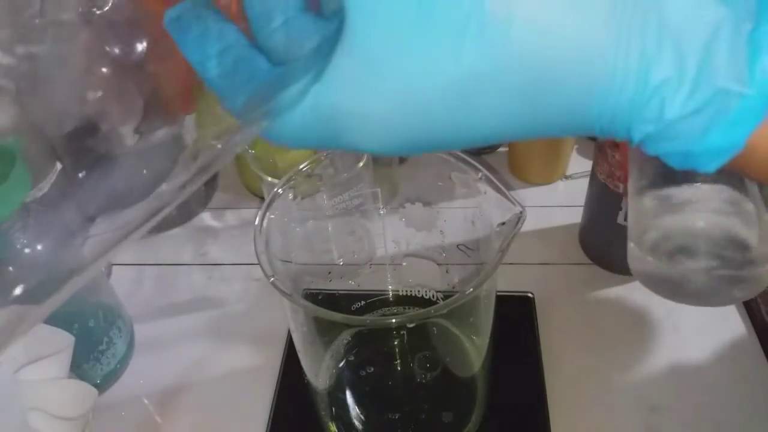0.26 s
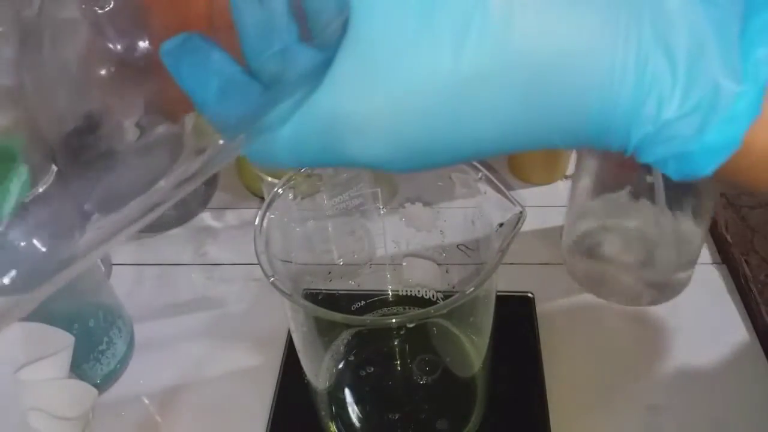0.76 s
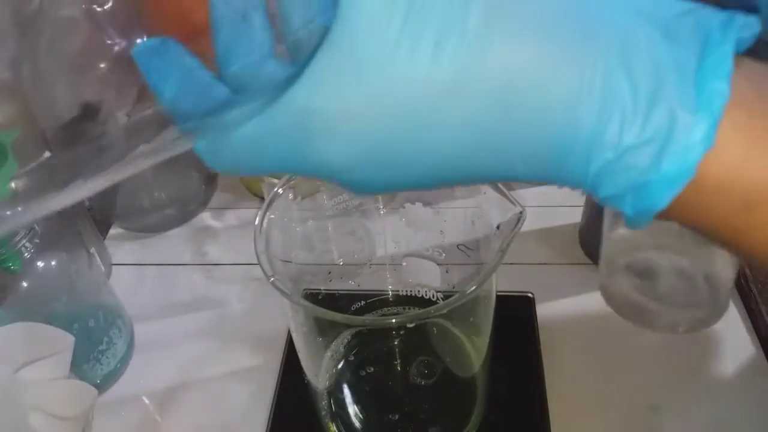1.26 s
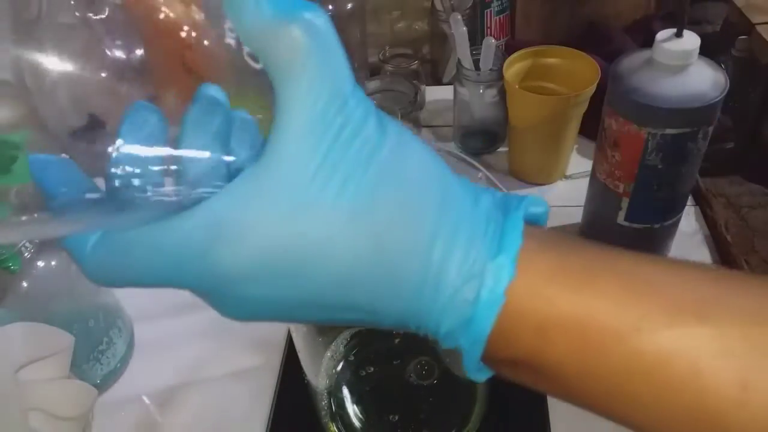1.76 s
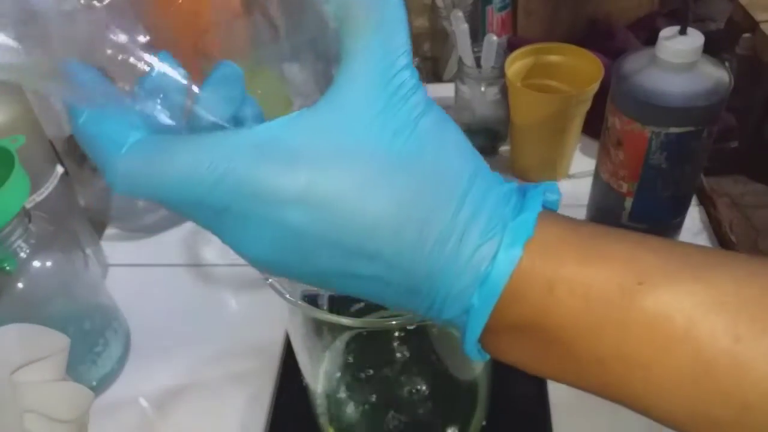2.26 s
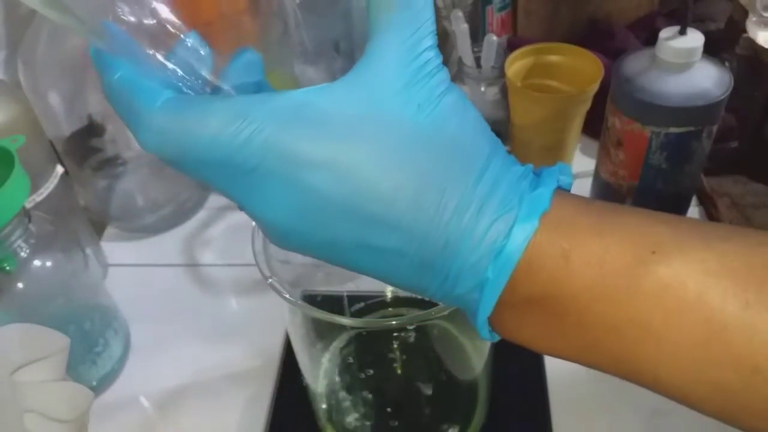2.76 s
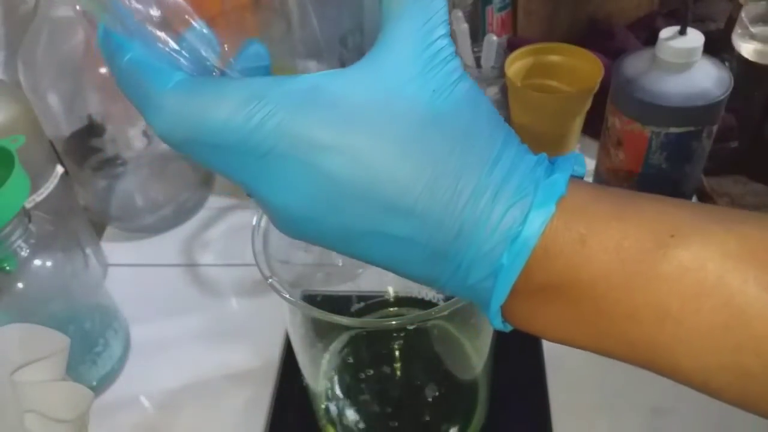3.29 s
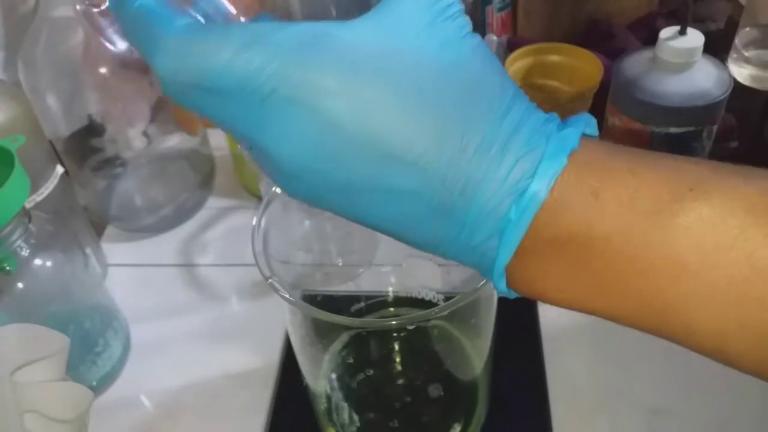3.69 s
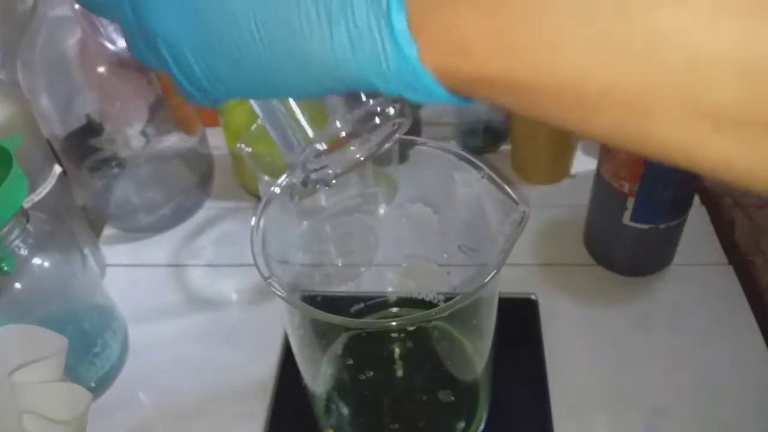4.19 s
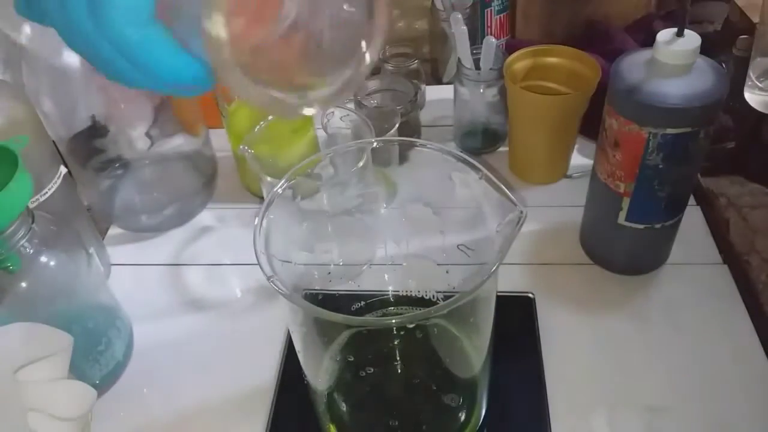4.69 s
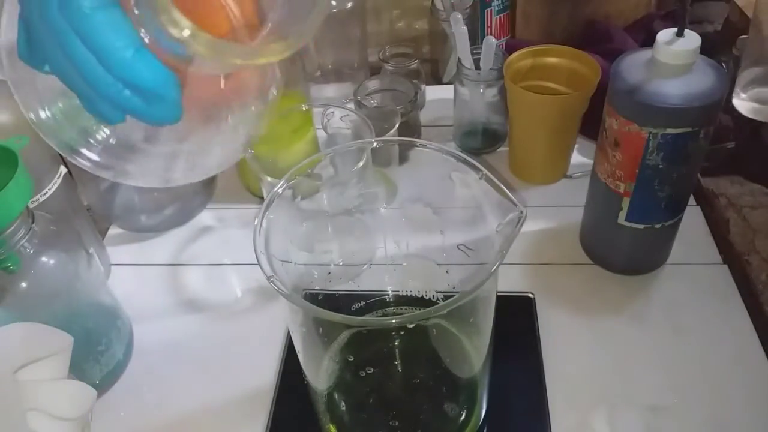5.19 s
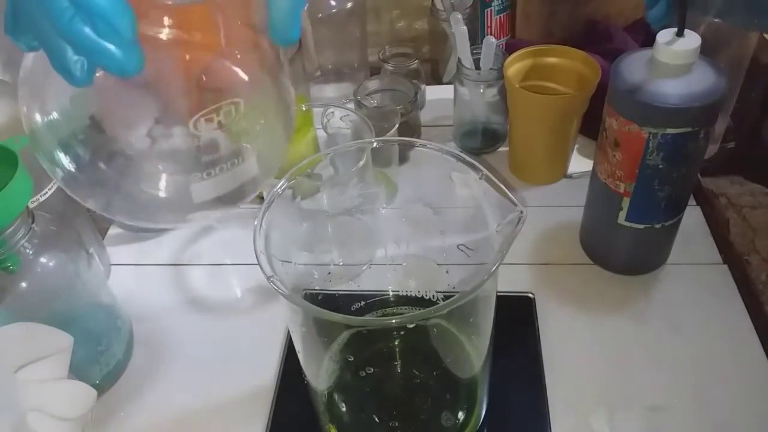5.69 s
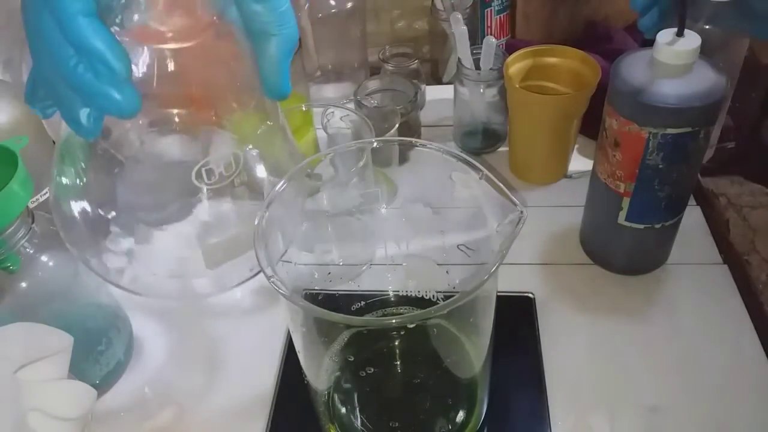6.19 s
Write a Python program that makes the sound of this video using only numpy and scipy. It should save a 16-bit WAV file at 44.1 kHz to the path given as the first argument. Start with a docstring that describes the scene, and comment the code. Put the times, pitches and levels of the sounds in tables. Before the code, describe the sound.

In a small, fairly dry room, heard close, a trigger sprayer works in quick strokes from the very start until about 1.2 seconds, roughly one every quarter second. Each full stroke is a very short, rough valve buzz with a hissing jet; most make the glass flask ring brightly. Sharp plastic clicks, rasps and tiny gulps come between, with one high bubble blip near 0.95. After a pause, the rinse is poured at about 2.0: a tight cluster of loud, bright and hollow plops, smaller splashes to 2.3, then faint drips and trickling until 3.3. Quiet follows, with barely audible drops at 4.1 and 4.55. At 5.93 the flask clacks on tile, bounces and rings briefly, with softer rocking knocks at 6.2 and 6.27. Underneath are low hum, faint hiss and a distant engine rising until 4.9, then sinking to idle.

```python
"""A trigger sprayer rinses a glass flask in quick strokes: valve buzz, hissing jet and ringing glass from pulses,
coloured noise and wavering modes, then the plastic clicks and rasps of the trigger springing back.
The rinse is tipped into a beaker as decaying bubble tones and slaps of noise.
The flask is set down on a tiled bench as struck modes and noise knocks, and rocks once.
A small room lies around it with air noise, mains hum, thin high hiss, faint tones and a distant engine."""
import sys
import numpy as np
from scipy import signal
from scipy.fft import rfft, irfft, next_fast_len
from scipy.io import wavfile
from scipy.ndimage import map_coordinates

SR = 44100
rng = np.random.default_rng(int(sys.argv[2]) if len(sys.argv) > 2 else 0)


def unload_audio(sound):
    """Save the sound as a 16-bit wav file, at the path given as the first command line argument."""
    columns = np.transpose(np.atleast_2d(sound))
    # keep every value between -1 and 1, then stretch to whole-number steps
    steps = np.round(np.clip(columns, -1, 1) * 32767)
    wavfile.write(sys.argv[1], SR, steps.astype(np.int16))


N = 284445
TOP_HZ = 15550  # upper band limit


def amp(db):
    """Decibels to gain."""
    return 10 ** (np.asarray(db) / 20)


def unit(x):
    """Scale to rms 1."""
    return x / np.sqrt(np.mean(x ** 2) + 1e-20)


def along(points, hz):
    """Read (Hz, value) points on a log frequency axis."""
    point_hz, values = np.transpose(points)
    return np.interp(np.log(hz + 1), np.log(point_hz + 1), values)


def clock(seconds):
    """Sample times of a stretch."""
    return np.arange(int(seconds * SR)) / SR


def add(track, s, sound):
    """Mix a sound into the track at s seconds, cut at the track's ends."""
    at = round(s * SR)
    part = sound[max(-at, 0):max(N - at, 0)]
    track[max(at, 0):][:len(part)] += part


def wobble(rate, size):
    """A smooth random curve, rate knots a second."""
    knots = rng.standard_normal(int(size * rate / SR) + 4)
    return map_coordinates(knots, [np.arange(size) * rate / SR])


def filtered(x, response):
    """Shape the spectrum of x by a response of frequency."""
    padded = next_fast_len(len(x) + 8192)
    spectrum = rfft(x, padded) * response(np.fft.rfftfreq(padded, 1 / SR))
    return irfft(spectrum, padded)[:len(x)]


def noise(colour, size):
    """Noise of rms 1 with the given colour."""
    return unit(filtered(rng.standard_normal(size), lambda hz: amp(along(colour, hz))))


def band(hz, width, size):
    """Narrow noise of rms 1 around one pitch."""
    return unit(filtered(rng.standard_normal(size), lambda f: np.exp(-2 * ((f - hz) / width) ** 2)))


def burst(colour, t, t60, attack):
    """A knock of coloured noise that dies away."""
    return noise(colour, len(t)) * amp(-60 * t / t60) * (1 - np.exp(-t / attack))


def swell(t, length, rise, t60):
    """An envelope that climbs for the rise time and starts to die after the length."""
    return np.minimum(t / rise, 1) * amp(-60 * np.maximum(t - length, 0) / t60)


def causal(colour):
    """The short impulse response of the colour, its energy packed at the front (minimum phase)."""
    log_gain = np.log(amp(along(colour, np.fft.rfftfreq(1024, 1 / SR))))
    cepstrum = irfft(log_gain)
    fold = 1 + np.sign(len(cepstrum) / 2 - np.arange(len(cepstrum)))
    fold[0] = 1
    return irfft(np.exp(rfft(cepstrum * fold)))


# Colour of the valve's spits. Each row: frequency in Hz, level in dB per Hz.
BUZZ_COLOUR = [(180, -71.5), (300, -45), (877, -26), (1160, -32.5), (1750, -13.5), (2040, -17), (2610, -3),
               (3280, -14), (4720, -0.5), (7750, -0.5), (9760, -24), (11700, -2), (15500, -29)]
# Colour of the jet's hiss, also of the trigger's tick. Each row: frequency in Hz, level in dB per Hz.
JET_COLOUR = [(180, -49), (300, -25.5), (1180, -25.5), (1300, -2), (1750, -27.5), (1910, -11.5),
              (3870, -13), (7140, -5), (8560, -17.5), (15500, -6.5)]


def valve_buzz(t, length, rate_hz, hiss_db=-6):
    """The valve chatters open and shut: each opening is a sharp spit that echoes in the flask's neck."""
    cycles = np.cumsum(rate_hz * (1 + .015 * wobble(90, len(t)))) / SR
    spits = np.diff(np.floor(cycles), prepend=-1) * amp(1.5 * wobble(400, len(t)))
    neck = rng.standard_normal(len(t)) * np.exp(-t / .0006)
    neck[0] += 3.5  # the direct spit ahead of its echoes
    echoed = signal.fftconvolve(spits, neck)[:len(t)]
    pulses = signal.fftconvolve(echoed, causal(BUZZ_COLOUR))[:len(t)]
    hiss = amp(hiss_db) * noise(JET_COLOUR, len(t))
    return unit(unit(pulses) + hiss) * swell(t, length, rise=0.012, t60=0.0229)


# Modes of the glass under the jet, lowest first. Each row: frequency in Hz, level relative to the others in dB.
SINGING_MODES = [(1324, -35), (1599, -49.5), (2622, -26), (4303, -32.5), (4440, -32), (4620, -35),
                 (5033, -26), (5222, -38.5), (6790, -34.5), (7060, -28), (7305, -46), (7843, -43),
                 (10088, -40.5), (10944, -58), (11364, -52), (11940, -50), (13469, -43), (14142, -57.5),
                 (15342, -57)]


def singing_glass(t, push, fade_t60=0.12, lowest_t60=0.32, waver=0.74):
    """The jet drives the glass; low modes build up slowly and linger."""
    drive = swell(np.maximum(t - .008, 0), push, rise=0.0072, t60=fade_t60)
    ring = np.zeros(len(t))
    for hz, db in SINGING_MODES:
        t60 = lowest_t60 * SINGING_MODES[0][0] / hz
        keep = amp(-60 / (SR * t60))  # share of the ring left after one sample
        level = signal.lfilter([1 - keep], [1, -keep], drive)
        unsteady = wobble(hz / 28, len(t)) + 1j * wobble(hz / 28, len(t))
        scatter = waver * np.sqrt(hz / 4000) * unsteady
        tone = np.real((1 + scatter) * np.exp(2j * np.pi * (hz * t + rng.random())))
        ring += amp(db + 3.5) * level * tone
    return ring


# Trigger squeezes. Each row: start in seconds, buzz length in seconds, spray level in dB,
# ring of the glass where the jet lands in dB.
SQUEEZE_STROKES = [(-.058, .036, -9.5, -4.5), (0.105, 0.0037, -33, -4.5), (.212, .031, -11, 2.5),
                   (0.48, .039, -11, -34), (0.749, .031, -10.5, -3.5), (0.992, .033, -11, 0)]
VALVE_HZ, JET_DB = 453.7, -15  # mean chatter rate; jet against the buzz
PUSH_OVER_BUZZ = 1.745  # the push on the glass lasts this many buzz lengths


def squeezes():
    """Each squeeze buzzes, and the jet hisses into the flask and sets it singing."""
    out, t = np.zeros(N), clock(.4)
    for s, length, db, ring_db in SQUEEZE_STROKES:
        flutter = amp(0.5 * wobble(113, len(t)))
        jet = noise(JET_COLOUR, len(t)) * swell(t, length, rise=0.052, t60=0.41) * flutter
        spray = valve_buzz(t, length, VALVE_HZ) + amp(JET_DB) * jet
        ring = singing_glass(t, PUSH_OVER_BUZZ * length)
        add(out, s, amp(db) * spray + amp(ring_db) * ring)
    return out


# A distant engine gathers speed steadily, then is let off and sinks to idle.
ENGINE_START_HZ, SPEEDUP_HZ_PER_S, LET_OFF_S, IDLE_HZ, SINK_S = 42, 10.1, 4.9, 49, .55
ENGINE_DB, ENGINE_DB_PER_OCTAVE, COAST_DB = -49.5, 6, -12  # mean at top speed; growth with speed; drop once let off


def engine():
    """The firing note of a distant engine climbs and grows, then sinks to idle."""
    t = np.arange(N) / SR
    driven = ENGINE_START_HZ + SPEEDUP_HZ_PER_S * np.minimum(t, LET_OFF_S)
    load = np.exp(-np.maximum(t - LET_OFF_S, 0) / SINK_S)
    rate = IDLE_HZ + (driven - IDLE_HZ) * load
    speed_db = ENGINE_DB_PER_OCTAVE * np.log2(rate / rate.max())
    level = ENGINE_DB + speed_db + COAST_DB * (1 - load) + 1.5 * wobble(1.7, N)
    return amp(level) * unit(np.sin(2 * np.pi * np.cumsum(rate) / SR))


# Colour of the room air. Each row: frequency in Hz, level in dB per Hz.
AIR_COLOUR = [(25, -28.5), (40, -27), (65, 3.5), (135, 0), (200, -15), (400, -16.5), (800, -20.5),
              (1100, -25.5), (2200, -29), (5000, -25), (9500, -35.5), (10500, -23), (15500, -31.5)]
# Bands of high hiss. Each row: centre in Hz, width in Hz, mean level in dB.
HISS_BANDS = [(6670, 67, -58), (6625, 680, -59), (8050, 810, -57), (11100, 730, -68.5)]
# Faint blurred tones in the room. Each row: time of the peak in seconds, length in seconds, pitch in Hz, level in dB.
ROOM_TONES = [(1.49, .28, 540, -60), (1.601, 0.35, 4160, -57), (2.48, 0.51, 4400, -61),
              (2.59, 0.2, 800, -59), (3.44, .17, 5000, -60), (4.041, 0.37, 354, -58),
              (5.49, 0.29, 780, -56.5)]
FAINT_BLUR = 0.085  # width as a share of the pitch


def background(air_db=-51, hum_db=-53, hum_hz=120):
    """Room air, mains hum, narrow bands of hiss, faint tones and the engine."""
    t = np.arange(N) / SR
    hum = amp(hum_db + 2.44 * wobble(1.646, N)) * unit(np.sin(2 * np.pi * hum_hz * t))
    hiss = sum(amp(db + 0.54 * wobble(3.5, N)) * band(hz, width, N) for hz, width, db in HISS_BANDS)
    out = amp(air_db) * noise(AIR_COLOUR, N) + hum + hiss + engine()
    for s, length, hz, db in ROOM_TONES:
        arch = np.sin(np.pi * clock(length) / length)
        add(out, s - length / 2, amp(db) * band(hz, FAINT_BLUR * hz, len(arch)) * arch)
    return out


# Colour of the plastic snap. Each row: frequency in Hz, level in dB per Hz.
SNAP_COLOUR = [(710, -26), (1200, -8), (2680, -5), (3280, -8.5), (4110, -3.5), (4570, -2), (5200, -11.5),
               (6940, -6), (8790, -26), (10300, -12), (15500, -8.5)]
# Colour of the housing's knock. Each row: frequency in Hz, level in dB per Hz.
HOUSING_COLOUR = [(100, -19.5), (250, -11.5), (500, -4.5), (800, 0.5), (1200, -11), (2000, 1), (3500, -11)]


def click(t, knock_db, tick_db):
    """A plastic snap with a knock of the housing and a bright tick, each a dying burst of noise."""
    snap = burst(SNAP_COLOUR, t, t60=0.044, attack=0.00075)
    tick = burst(JET_COLOUR, t, t60=.006, attack=.0001)
    knock = burst(HOUSING_COLOUR, t, t60=0.049, attack=0.00036)
    return amp(-12.0) * snap + amp(knock_db) * knock + amp(tick_db) * tick


# The trigger springs back. Each row: time of its end stop in seconds, stop level in dB,
# travel since the finger let go in seconds, letting-go click level in dB.
TRIGGER_RETURNS = [(.092, 4, .019, -5), (.364, -0.5, 0.023, -9.5), (.643, -1, 0.028, -14.5),
                   (.886, 3, 0.021, -18), (1.136, 4.5, .022, -4)]
# The finger takes up the trigger's slack before the next squeeze. Each row: time in seconds, level in dB.
FINGER_GRIPS = [(.159, -5.5), (.429, -1), (.7, -1), (.942, 4.5)]
# Colour of the piston's rasp. Each row: frequency in Hz, level in dB per Hz.
SLIDE_COLOUR = [(290, -62), (500, -34), (851, -28.5), (1250, -9), (2890, -9.5), (3850, 6.5), (5130, -2),
                (6180, 4), (8850, -10), (13200, -4.5), (15500, -19.5)]
SLIDE_S, SLIDE_DB = .016, -14  # the rasp starts this long before the stop; its level


def trigger():
    """The finger lets go, the piston rasps back to its stop, and the finger grips again."""
    out, t = np.zeros(N), clock(0.1486)
    for s, stop_db, travel, let_go_db in TRIGGER_RETURNS:
        rasp = noise(SLIDE_COLOUR, len(t)) * amp(2.9 * wobble(900, len(t)))
        slide = rasp * swell(t, SLIDE_S, rise=0.78 * SLIDE_S, t60=0.051)
        add(out, s - travel, amp(let_go_db) * click(t, knock_db=-33, tick_db=0))
        add(out, s - SLIDE_S, amp(SLIDE_DB) * slide)
        add(out, s, amp(stop_db) * click(t, knock_db=-17, tick_db=-12.5))
    for s, db in FINGER_GRIPS:
        add(out, s, amp(db) * click(t, knock_db=-22.5, tick_db=-7.5))
    return out


def bubble(t, hz, t60, rise=0.0267, waver=0.019):
    """A trapped bubble rings, climbing in pitch as it nears the surface."""
    pitch = hz * (1 + rise * np.minimum(t / t60, 1) + waver * wobble(383, len(t)))
    tone = np.sin(2 * np.pi * np.cumsum(pitch) / SR)
    return tone * amp(-60 * t / t60) * (1 - np.exp(-t / 0.0016))


# Loud small bubbles in the bottle. Each row: start in seconds, pitch in Hz, level in dB, t60 in seconds.
LOUD_BOTTLE_BUBBLES = [(.949, 3257, -2.5, 0.037)]
GULP_HZ, GULP_OCTAVES, GULP_DB, GULP_T60 = 814, 0.14, -28, 0.043  # middle pitch, its scatter, level, seconds


def gulps():
    """As the piston draws liquid, air bubbles into the bottle at each stop and grip."""
    out, t = np.zeros(N), clock(.1)
    for s, *_ in TRIGGER_RETURNS + FINGER_GRIPS:
        hz = GULP_HZ * 2 ** (GULP_OCTAVES * rng.standard_normal())
        add(out, s, amp(GULP_DB) * bubble(t, hz, GULP_T60))
    for s, hz, db, t60 in LOUD_BOTTLE_BUBBLES:
        add(out, s, amp(db) * bubble(t, hz, t60))
    return out


def droplets(t, mid_hz, octaves, seconds, cycles, count):
    """A thinning shower of tiny bubbles, with the energy of 10 ms at rms 1."""
    when, pitch, size = rng.standard_normal((count, 3)).T[:, :, None]
    start = seconds * np.abs(when) / 2
    hz = np.minimum(mid_hz * 2 ** (octaves * pitch), TOP_HZ)
    age = np.maximum(t[:len(t) // 2] - start, 0)
    level = amp(6.5 * size - 12 * start / seconds)  # later ones are softer
    envelope = np.exp(-age * hz / cycles) * (1 - np.exp(-age * hz / 2))
    grains = level * np.sin(2 * np.pi * hz * age) * envelope
    shower = np.pad(grains.sum(0), (0, len(t) - len(t) // 2))
    return shower / np.linalg.norm(shower) * np.sqrt(SR / 100)


# The loudest drops. Each row: start in seconds, bubble pitch in Hz, bubble level in dB, relative fine spray level in dB.
LOUD_DROPS = [(2.018, 3384, -13, -28.5), (2.024, 788, -17.5, -46), (2.043, 3434, -11, -28),
              (2.052, 1065, -10.5, -37), (2.057, 2256, -20, -37), (2.087, 3350, -8.5, -29),
              (2.213, 2152, -17, -22.5), (2.263, 2066, -26, -41), (2.33, 2120, -33.5, -29.5),
              (2.586, 1452, -43.5, -51), (2.638, 1660, -30.5, -38.5), (2.782, 2770, -34.5, -56),
              (2.835, 2760, -42, -40), (2.903, 2404, -35, -58), (2.955, 2296, -25.5, -54),
              (2.963, 4780, -30.5, -58), (3.033, 2363, -40.5, -39), (3.13, 2134, -44.5, -58),
              (3.193, 2740, -38, -41.5), (3.199, 3790, -34, -49), (3.285, 4170, -43.5, -62),
              (4.1, 3610, -34.5, -62), (4.558, 1716, -50, -45)]
# Colour of liquid slapping the surface. Each row: frequency in Hz, level in dB per Hz.
WASH_COLOUR = [(130, -4), (320, 3.5), (700, -6.5), (1600, -0.5), (3000, -1), (7800, -3), (9500, -15.5),
               (12000, -1.5), (15500, -5)]
BUBBLE_T60, CHURN_HALVES_DB = 0.028, 18  # t60 of a 0 dB bubble in s; this much harder churns more and halves it
SPLASH_DB = -15.5  # small bubbles against the big one


def drops(spray_hz=6800, wash_db=-10, slap_db=-25, lead=.007):
    """A drop slaps the surface and traps one big bubble; smaller ones churn around it and fine spray falls back."""
    out, t = np.zeros(N), clock(0.46)
    for s, hz, db, spray_db in LOUD_DROPS:
        t60 = BUBBLE_T60 * 2 ** (-db / CHURN_HALVES_DB)
        splash = droplets(t, hz, octaves=0.45, seconds=.024, cycles=8.0, count=30)
        spray = droplets(t, spray_hz, octaves=.33, seconds=0.036, cycles=9, count=40)
        wash = burst(WASH_COLOUR, t, t60=0.14, attack=0.005) * amp(3 * wobble(200, len(t)))
        plop = bubble(t, hz, t60) + amp(SPLASH_DB) * splash
        add(out, s, amp(db) * plop + amp(spray_db - 6.0) * spray)
        # the slap comes just before the cavity closes
        add(out, s - lead, (amp(spray_db + wash_db) + amp(db + slap_db)) * wash)
    return out


def trickle(start=2.1, end=3.35, loudest_db=-51, mid_hz=3200, count=110):
    """The last thread of liquid makes a scatter of tiny short-lived bubbles."""
    out, t = np.zeros(N), clock(.1)
    for when, pitch, size in rng.random((count, 3)):
        hz = mid_hz * 2 ** (2 * pitch - 1)  # within an octave either way
        blip = bubble(t, hz, t60=0.14)
        add(out, start + when * (end - start), amp(loudest_db + 10 * (size - 1.0)) * blip)
    return out


# The flask meets the tiles. Each row: start in seconds, clack level in dB, ring level in dB,
# bench thump level in dB, share of the base resting on the tiles from 0 to 1.
FLASK_CONTACTS = [(5.928, -7.5, 6.5, -32.5, 1), (5.940, -19.5, 6.5, -21.5, 0.7),
                  (5.962, -30.5, -1.5, -29, 0), (6.201, -15.5, -6, -32, 0.46),
                  (6.267, -20.5, -11, -35.5, 0.88)]
# Modes of the flask struck at its base. Each row: frequency in Hz, level in dB, free t60 in seconds,
# level change in dB with the base fully resting.
FLASK_MODES = [(500, -41, 0.69, -2), (1004, -23.5, 0.024, 19), (1311, -37.5, 3.6, 9.5),
               (1347, -27.5, 5.1, -21.5), (2030, -21, 0.14, 4), (2290, -31.5, 0.51, -1),
               (2308, -25, 0.6, 0), (2673, -15.5, 0.29, -5), (2710, -19, 0.29, 0.5), (3114, -20.5, 0.14, 3),
               (3180, -14, 0.14, -3.5), (3516, -11.5, 0.21, -5), (3630, -9, 0.093, 0.5),
               (3810, -9, 0.023, 6.5), (4264, -19.5, 0.14, -1.5), (4580, -16, 0.074, 3),
               (4614, -13.5, 0.072, 0.5), (5640, -25, 0.071, 10.5), (7084, -37.5, 0.049, 0)]
# Colour of the clack. Each row: frequency in Hz, level in dB per Hz.
CLACK_COLOUR = [(120, -35.5), (200, -14), (585, -25), (1050, -14), (1880, -12.5), (2060, -6.5), (2470, -17),
                (3550, -11.5), (4030, -18.5), (4660, -4), (5300, -18.5), (7480, -7.5), (9310, -27),
                (15500, -16.5)]
# Colour of the tiles' knock. Each row: frequency in Hz, level in dB per Hz.
TILE_COLOUR = [(120, -27), (260, -5), (360, -3), (550, -8), (780, 6), (1050, -1.5), (1400, -6),
               (2500, -32.5)]
# Colour of the bench's thump. Each row: frequency in Hz, level in dB per Hz.
BENCH_COLOUR = [(40, -41), (100, -1), (150, 2), (200, -22), (400, -14.5), (1000, -62)]


def flask_ring(t, resting):
    """The struck flask rings in its modes; the tiles drain it while it rests."""
    ring = np.zeros(len(t))
    for hz, db, t60, rest_db in FLASK_MODES:
        tone = np.sin(2 * np.pi * (hz * t + rng.random()))
        ring += amp(db + resting * rest_db - 60 * t / t60) * tone
    return ring * amp(-resting * 60 * t) * (1 - np.exp(-t / 0.008))


def flask_down(soft_hz=7000):
    """The flask clacks on the tiles, bounces clear and rings freely, then drops back and settles."""
    out, t = np.zeros(N), clock(0.76)
    next_contact = [row[0] for row in FLASK_CONTACTS[1:]] + [np.inf]
    for (s, clack_db, ring_db, thump_db, resting), until in zip(FLASK_CONTACTS, next_contact):
        choke = amp(-60 * np.maximum(s + t - until, 0) / 0.019)  # the next contact chokes the ring
        ring = flask_ring(t, resting) * choke
        tile_knock = burst(TILE_COLOUR, t, t60=0.089, attack=0.0043)
        clack = burst(CLACK_COLOUR, t, t60=0.12, attack=0.0015) + amp(-8.5) * tile_knock
        cutoff = np.clip(soft_hz * amp(clack_db + 14), 2000, 18000)  # gentler contacts are duller
        clack = signal.lfilter(*signal.butter(1, cutoff, fs=SR), clack)
        thump = burst(BENCH_COLOUR, t, t60=0.16, attack=0.0013)
        add(out, s, amp(clack_db) * clack + amp(ring_db) * ring + amp(thump_db) * thump)
    return out


# Decay of the small room. Each row: frequency in Hz, t60 in seconds.
ROOM_DECAY = [(150, 0.56), (1000, 0.19), (5000, 0.14), (15000, 0.11)]


def room(x):
    """The small room answers after 4 ms with a tail of noise; the treble dies first."""
    hz, t, grid = signal.stft(rng.standard_normal(SR // 2), SR, nperseg=256)
    decay = amp(-60 * t / along(ROOM_DECAY, hz)[:, None])
    tail = signal.istft(grid * decay, SR, nperseg=256)[1]
    return signal.fftconvolve(x, np.pad(tail, (int(.004 * SR), 0)) / np.linalg.norm(tail))[:N]


def scene():
    """Spraying, pouring and setting down in the room; the liquid gets the stronger echo."""
    handling = squeezes() + trigger() + gulps() + flask_down()
    liquid = drops() + trickle()
    echoes = amp(-14) * room(handling) + amp(-11) * room(liquid)
    return (handling + liquid + echoes + background())[None]


def record(dry):
    """The loudest peaks are rounded off; nothing passes above the band limit."""
    rounded = dry[0] / (1 + np.abs(dry[0]) ** 4) ** (1 / 4)
    return filtered(rounded, lambda hz: hz < TOP_HZ)[None]


dry = scene()
out = record(dry)
unload_audio(out)
```